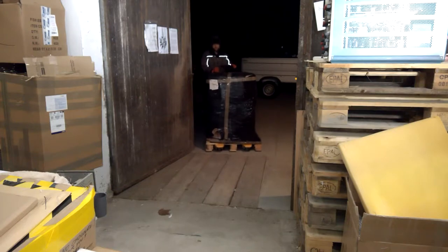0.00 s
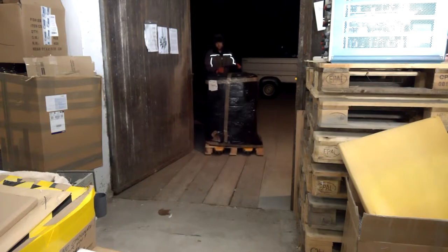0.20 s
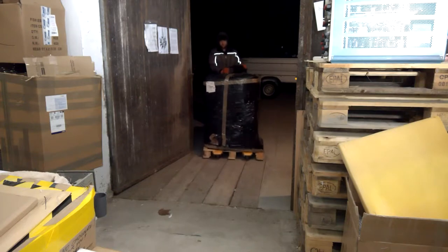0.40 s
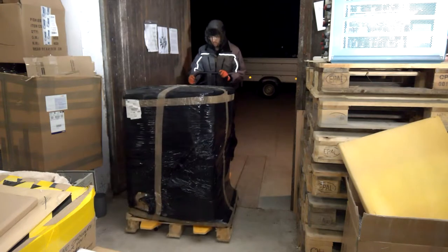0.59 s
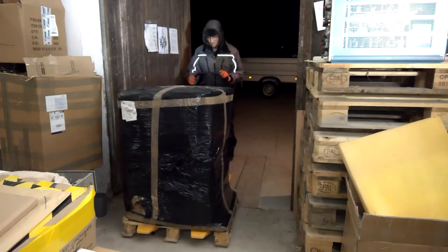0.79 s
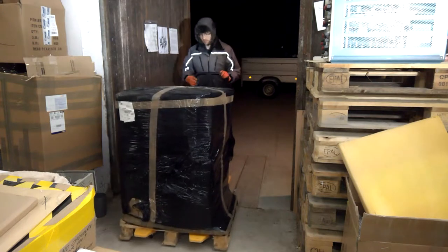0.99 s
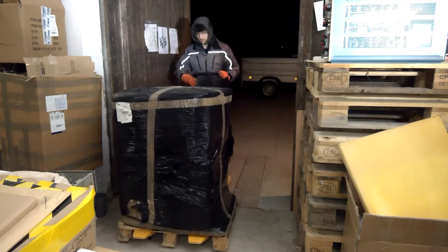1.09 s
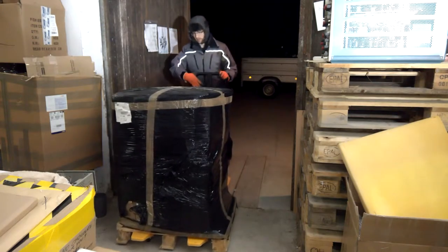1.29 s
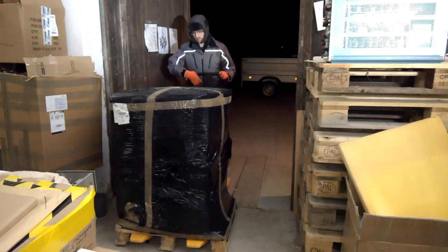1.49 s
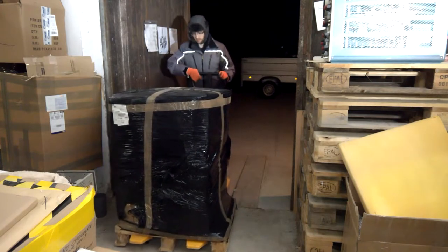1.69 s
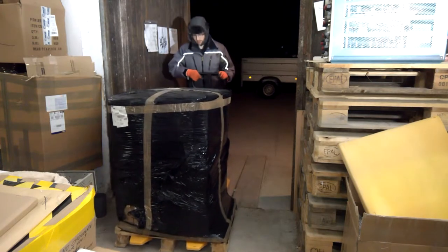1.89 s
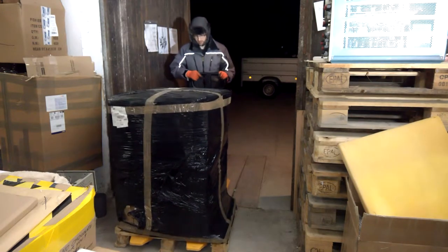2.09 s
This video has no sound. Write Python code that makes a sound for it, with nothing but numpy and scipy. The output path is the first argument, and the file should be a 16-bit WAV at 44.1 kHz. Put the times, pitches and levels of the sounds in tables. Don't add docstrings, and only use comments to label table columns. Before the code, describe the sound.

A loaded pallet truck rattles fast over planks, thuds hard, then creeps and stops on concrete

```python
import sys
import numpy as np
from scipy import signal
from scipy.io import wavfile

SR = 44100
rng = np.random.default_rng(int(sys.argv[2]) if len(sys.argv) > 2 else 0)


def pcm_store(signal):
    levels = np.round(np.clip(np.atleast_2d(signal), -1, 1) * 32767)
    wavfile.write(sys.argv[1], SR, levels.astype(np.int16).T)


def volts(x):
    e = np.asarray(x, float) / 20
    return 10 ** e


N = 92610


def unit(x):
    return x / np.sqrt(np.mean(x ** 2) + 1e-20)


def curve(rows):
    return volts(np.interp(np.arange(N) / SR, *np.transpose(rows)))


def at_hz(points, hz):
    table_hz, db = np.transpose(points)
    return np.interp(np.log(hz), np.log(table_hz), db)


def filtered(x, hz, kind):
    return signal.sosfilt(signal.butter(2, hz, kind, fs=SR, output="sos"), x)


def drift(rate_hz):
    step, settle = 40, 2000
    r = np.exp(-2 * np.pi * rate_hz * step / SR)
    noise = rng.standard_normal(N // step + settle + 2)
    slow = signal.lfilter([1], [1, -2 * r, r * r], noise)[settle:]
    return np.interp(np.arange(N) / step, np.arange(len(slow)), unit(slow))


def ring(x, hz, t60_s):
    r, w = volts(-60 / (t60_s * SR)), 2 * np.pi * hz / SR
    return signal.lfilter([0, np.sin(w)], [1, -2 * r * np.cos(w), r * r], x + 1e-18)


def grains(rate_hz, spread_db):
    size = volts(spread_db * np.minimum(rng.exponential(1, (2, N)), 5))
    size = size * rng.choice([-1, 1], (2, N))
    return unit(size * (rng.random((2, N)) < rate_hz / SR))


# (frequency [Hz], correlation [-])
LIKENESS = [(60, 0.97), (380, 0.89), (2380, 0.32), (15000, 0.0084)]


def coloured(pair, spectrum, patchy_db):
    out, together = 0, drift(9)
    edges_hz = 22 * 2 ** np.arange(0, 9.8, .5)
    for k, (low, high) in enumerate(zip(edges_hz, edges_hz[1:])):
        mid, side = filtered(np.roll(pair, 97 * k, axis=1), [low, high], "band")
        hz = np.sqrt(low * high)
        alike = np.clip(at_hz(LIKENESS, hz), -1, 1)
        flicker_db = patchy_db * (.5 * together + drift(17.2))
        stereo = np.sqrt(1 + alike) * mid + np.sqrt(1 - alike) * side * [[1], [-1]]
        out = out + volts(at_hz(spectrum, hz) + flicker_db) * stereo
    return unit(out)


def body(x, peaks):
    out = 0
    for k, (hz, width_hz, db) in enumerate(peaks):
        strength = volts(db + 2.1 * drift(28)) * np.sqrt(width_hz)
        out = out + strength * unit(ring(np.roll(x, 211 * k), hz, 2.4 / width_hz))
    return unit(out)


def struck(hits, modes, vary_db, contact_s):
    s, db = np.transpose(hits)
    out, luck = 0, rng.normal(0, 1, (len(s), len(modes)))
    for k, (hz, mode_db, t60_s) in enumerate(modes):
        clicks = np.zeros(N)
        clicks[(s * SR).astype(int)] = volts(db + mode_db + vary_db * luck[:, k])
        swell_t60_s = 1 / (1 / t60_s + 1 / (np.log(1000) * contact_s))
        out = out + ring(clicks, hz, t60_s) - ring(clicks, hz, swell_t60_s)
    return out


def bursts(events, octaves, rate_hz, alike, lead, rise_s=1e-5):
    out, t = np.zeros((2, N)), np.arange(SR // 2) / SR
    grit = grains(rate_hz, spread_db=-2.5)
    for s, db, hz, t60_s, *pan_db in events:
        i = int(s * SR)
        envelope = volts(-60 * t / t60_s) * (1 - np.exp(-(t / rise_s) ** 2))
        mid, side = grit[:, i:i + len(t)] * envelope[:N - i]
        mid = mid + lead * (t[:len(mid)] == 0)
        band_hz = [hz * 2 ** -octaves, min(hz * 2 ** octaves, .45 * SR)]
        both = filtered(mid + alike * side * [[1], [-1]], band_hz, "band")
        pan = sum(pan_db) / 2 * np.array([[1], [-1]])
        out[:, i:i + len(t)] += volts(db + pan) * both / np.abs(both).max()
    return out


def room(x):
    t60_s, level_db, cut_hz = 0.29, -16, 2600
    t = np.arange(SR // 2) / SR
    noise = rng.standard_normal((2, len(t)))
    tail = signal.lfilter([1], [1, -np.exp(-2 * np.pi * cut_hz / SR)], noise)
    tail = filtered(tail * volts(-60 * t / t60_s) * (t > .006), 600, "high")
    tail = tail / np.sqrt(np.sum(tail ** 2) / 2)
    mono = np.atleast_2d(x).mean(0)[None]
    return x + volts(level_db) * signal.fftconvolve(mono, tail, axes=1)[:, :N]


# (frequency [Hz], density [dB/Hz])
AIR = [(15, -27), (25, -9), (217, -18.5), (449, -9), (528, 28), (604, -43.5), (4570, 11), (5230, -18),
       (15800, -60.5)]


def room_air():
    return volts(-63) * coloured(rng.standard_normal((2, N)), AIR, patchy_db=7.0)


# (time [s], level [dB])
FAST_ROLL = [(0, -35), (.1, -34.5), (.14, -35.5), (.24, -34.5), (.27, -34.5), (.35, -33), (.445, -33)]
# (frequency [Hz], width [Hz], level [dB])
FRAME = [(188, 55, 5.5), (487, 88, 6), (829, 40, 3), (1026, 9.2, 9.5), (1280, 78, -1.5), (1592, 60, 5.5),
         (2073, 120, 2), (2754, 35, -1), (2956, 61, -0.5), (3532, 7.8, 1.5)]
# (frequency [Hz], density [dB/Hz])
FAST_COLOUR = [(18, -68.5), (30, -10.5), (193, 6), (931, 0.5), (1610, -18.5), (2390, -16), (2950, -8),
               (3190, -5.5), (15800, -30)]


def fast_roll():
    speed = curve(FAST_ROLL) * volts(3.5)
    frame = volts(-1.5) * body(grains(3000, spread_db=-0.5)[0], FRAME)
    hiss = volts(-3) * coloured(grains(9000, spread_db=3.0), FAST_COLOUR, patchy_db=1.25)
    return speed * frame, speed * hiss


# (time [s], level [dB])
CHATTER = [(0.0233, -39), (0.0233, -37), (0.0408, -33), (0.0553, -24.5), (0.0872, -25.5), (0.1106, -27),
           (0.1381, -31), (0.17, -32), (0.188, -30), (0.2024, -31), (0.2164, -29), (0.2334, -33),
           (0.2488, -24.5), (0.2703, -25.5), (0.2892, -23), (0.3172, -29), (0.3356, -27.5), (0.381, -29),
           (0.4125, -39.5), (0.4449, -32)]
# (frequency [Hz], level [dB], t60 [s])
ROLLERS = [(2090, -16, 0.024), (2826, -9.5, .04), (2974, -7, .05), (3610, -13, 0.018), (4700, -14, 0.028)]


def roller_chatter():
    return struck(CHATTER, ROLLERS, vary_db=3.0, contact_s=0.00046)


# (time [s], peak [dB], centre [Hz], t60 [s])
KNOCKS = [(.247, -19.5, 3280, 0.15), (.33, -23.5, 558, 0.252), (.39, -24.5, 600, 0.14),
          (.895, -30.5, 2420, 0.44), (1.266, -35.5, 1740, 0.039), (1.3465, -25.5, 590, 0.17),
          (1.347, -25.5, 1610, 0.21), (1.405, -39.5, 1680, 0.081), (1.9955, -37, 2145, 0.35),
          (2.0377, -22.5, 2600, 0.094), (2.039, -36.5, 695, 0.15), (2.046, -29.5, 1930, 0.083),
          (2.059, -36, 2830, .3)]


def knocks():
    return bursts(KNOCKS, octaves=0.51, rate_hz=2500, alike=0.39, lead=3.5)


# (time [s], peak [dB], centre [Hz], t60 [s])
SNAPS = [(.287, -23.5, 7700, 0.025), (.555, -46, 9000, 0.077), (.5666, -30.5, 10000, 0.1),
         (.6165, -33.5, 9000, 0.021), (.641, -33, 10000, .015), (.658, -37, 10500, .015),
         (.7187, -39, 5200, 0.2), (.8016, -31, 7240, 0.1), (.839, -29, 5950, 0.15), (.92, -36, 10000, .2),
         (1.0355, -31, 6750, 0.14), (1.052, -36, 7000, 0.091), (1.071, -26.5, 12900, 0.14),
         (1.3476, -18, 6130, 0.012), (1.352, -27.5, 9020, 0.091), (1.9955, -39, 9100, 0.2),
         (2.0377, -32, 8430, 0.15)]


def snaps():
    return bursts(SNAPS, octaves=0.45, rate_hz=7700, alike=0.71, lead=5.9)


# (time [s], peak [dB], centre [Hz], left over right [dB])
TICKS = [(0.2871, -16, 8100, -3), (.3005, -29, 7000, -2), (.401, -19.5, 8100, -1), (.4478, -28, 4500, 4),
         (0.447, -28, 10700, -11), (0.5643, -40, 10500, -3.5), (.5831, -41, 10500, 2),
         (.7836, -44, 11000, 13), (1.035, -24, 6200, 1), (1.0404, -28, 5200, 1), (1.0453, -25, 6600, 1),
         (1.0555, -30, 13000, 9), (1.0585, -29, 5300, 1), (1.0603, -29, 6030, -9), (1.0705, -25, 7040, 4),
         (1.0722, -30.5, 13000, 5), (1.0741, -23, 7000, -3), (1.077, -31, 12500, 9), (1.089, -27, 6000, 1)]


def film_ticks():
    t60_s = 0.0094
    events = [(s, db, hz, t60_s, pan_db) for s, db, hz, pan_db in TICKS]
    return bursts(events, octaves=0.23, rate_hz=16000, alike=.4, lead=14)


# (time [s], level [dB])
SILL = [
    (.293, -36),
    (.3306, -15),
    (.3575, -23.5),
    (.3765, -32),
    (.394, -17),
]
# (frequency [Hz], level [dB], t60 [s])
DECK = [(219, 2.5, 0.2), (286, -2.5, 0.056), (393.3, -3.5, 0.4), (475, -9, 0.13), (623, -11.5, 0.24),
        (754, -8, 0.14), (796, -10.5, 0.15)]
# (time [s], level [dB])
HEAVE = [
    (0.346, -17),
]
# (frequency [Hz], level [dB], t60 [s])
PLANKS = [(63, -2, 0.32), (104.3, -1, 0.21)]
# (time [s], level [dB])
SLAM = [
    (.4285, -9.5),
]
# (frequency [Hz], level [dB], t60 [s])
BOARDS = [(217.7, 0, 0.82), (386.3, -2.5, 0.9), (613, -2.5, 0.17), (665, 2, 0.061), (770, -8, .08),
          (495, -7.5, 0.091), (861, -5, 0.097)]


def sill_thud():
    caught_s, caught_db_per_s = 0.392, 399.5
    caught = volts(-caught_db_per_s * np.maximum(np.arange(N) / SR - caught_s, 0))
    deck = caught * struck(SILL, DECK, vary_db=2, contact_s=0.00091)
    planks = struck(HEAVE, PLANKS, vary_db=1.5, contact_s=.03)
    boards = struck(SLAM, BOARDS, vary_db=2.0, contact_s=0.0016)
    return filtered(planks - deck - boards, 1103, "low")


# (time [s], level [dB])
CREEP = [(.45, -41.5), (.54, -47), (.6, -41.5), (.7, -44), (.82, -43), (.93, -43), (1.0, -48), (1.12, -46),
         (1.19, -57.5), (1.29, -41.5), (1.43, -47.5), (1.47, -64.5), (1.56, -55.5), (1.61, -52),
         (1.66, -56), (1.8, -56.5), (1.92, -66), (2.06, -57)]
# (frequency [Hz], density [dB/Hz])
CREEP_COLOUR = [(15, -47), (25, 0.5), (123, -3), (350, -3.5), (453, -11), (2000, -28.5), (2600, -26),
                (4400, -120)]
# (frequency [Hz], width [Hz], level [dB])
LOAD = [(125, 35, 0.5), (250, 41, -10.5), (445, 60, -3.5), (742, 580, -5)]


def slow_roll():
    rumble = coloured(rng.standard_normal((2, N)), CREEP_COLOUR, patchy_db=3.0)
    forks = volts(-1) * body(grains(2500, spread_db=-1.5)[0], LOAD)
    return curve(CREEP) * volts(-2.5) * (rumble + forks)


# (time [s], level [dB])
RUSTLE = [(.45, -49), (.54, -53), (.59, -45), (.68, -50.5), (.8, -47), (.93, -38), (1.0, -49),
          (1.09, -45.5), (1.19, -56.5), (1.25, -46), (1.42, -46.5), (1.46, -52), (1.55, -50.5), (1.6, -52),
          (1.7, -55.5), (1.9, -52.5), (1.965, -62), (2.1, -51)]
# (frequency [Hz], density [dB/Hz])
FILM_COLOUR = [(530, -46), (900, 4.5), (1170, -2.5), (2910, -5.5), (3450, -8.5), (7080, -10.5),
               (15800, -21)]


def film_rustle():
    crinkle = grains(4200, spread_db=4.0) + 0.63 * rng.standard_normal((2, N))
    return curve(RUSTLE) * coloured(crinkle, FILM_COLOUR, patchy_db=3.0)


# (time [s], peak [dB], frequency [Hz], t60 [s])
BUMPS = [(.63, -34, 125, 0.36), (0.74, -34.5, 120, 0.27), (1.6285, -31.5, 7980, 0.068),
         (1.631, -35, 9000, .05), (1.239, -30.5, 211.7, 0.18), (1.264, -29.5, 125, 0.11),
         (1.273, -32.5, 898, 0.06), (1.281, -35.5, 907, 0.12), (1.284, -34, 635, 0.11),
         (1.274, -35, 339, .05), (1.28, -38.5, 1340, 0.069), (2.04, -41.5, 596, 0.14),
         (1.368, -38.5, 406, 0.15), (1.543, -37.5, 186.5, 0.11), (1.558, -41, 101, 0.14),
         (1.75, -42.5, 188, 0.13)]


def load_bumps():
    out, t = np.zeros(N), np.arange(N) / SR
    for s, db, hz, t60_s in BUMPS:
        age = np.maximum(t - s, 0)
        swell = 1 - np.exp(-age * hz / 1.47)
        out += volts(db - 60 * age / t60_s + 1.5) * swell * np.sin(2 * np.pi * hz * age)
    return out


# (time [s], peak [dB], centre [Hz], t60 [s])
RUBS = [
    (1.62, -24.5, 6400, 0.29),
    (1.621, -29.5, 2330, 0.22),
    (1.626, -31, 950, 0.19),
    (2.028, -32, 2700, .1),
    (1.2, -36, 8300, 0.17),
]


def rubs():
    return bursts(RUBS, octaves=0.58, rate_hz=6000, alike=0.54, lead=0, rise_s=0.0092)


# (time [s], peak [dB], centre [Hz], t60 [s])
SQUEAKS = [
    (1.428, -40, 5100, 0.046),
    (1.436, -47, 6250, .04),
    (1.474, -41.5, 5980, 0.044),
    (1.481, -39.5, 5100, .04),
]


def squeaks():
    return bursts(SQUEAKS, octaves=0.046, rate_hz=1500, alike=0.24, lead=1.5)


# (time [s], level [dB])
TOUCHES = [
    (1.622, -47),
    (1.6295, -28.5),
    (1.639, -27),
    (1.658, -31.5),
    (1.685, -47),
]
# (frequency [Hz], level [dB], t60 [s])
LATCH = [(1766, -20, .15), (3370, -16, .1), (3910, -18, .2), (4075, -5, .11), (4312, -16, .1),
         (4945, -20, .35), (5003, 3, .085), (5950, -14, .08), (11030, -22, .2)]


def latch():
    clink = volts(drift(68)) * struck(TOUCHES, LATCH, vary_db=2.5, contact_s=0.0021)
    return room(clink) * volts([[-1.5], [1.5]])


def scene():
    change_s = .4483
    frame, hiss = fast_roll()
    ramp = room(frame + sill_thud() + roller_chatter()) + hiss
    creep = slow_roll() + film_rustle() + load_bumps() + latch()
    hits = room(snaps() + knocks()) + room(film_ticks() + rubs() + squeaks())
    rolling = np.where(np.arange(N) < change_s * SR, ramp, creep)
    return (rolling + hits + room_air()) * volts([[-.3], [.3]])


def low_pass(x):
    return signal.sosfilt(signal.butter(12, 15960, fs=SR, output="sos"), x)


def record(dry):
    mix = np.array([dry[0], np.roll(dry[1], 2)])
    mix = signal.sosfilt(signal.ellip(10, .5, 70, 15900, fs=SR, output="sos"), mix)
    mix = filtered(mix, 45, "high")
    return low_pass(mix)


dry = scene()
out = record(dry)
pcm_store(out)
```